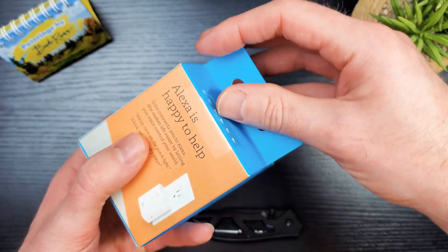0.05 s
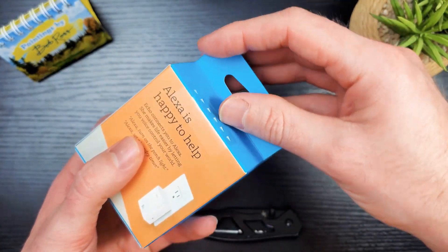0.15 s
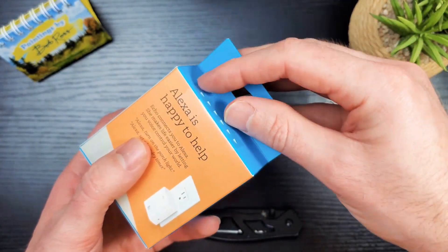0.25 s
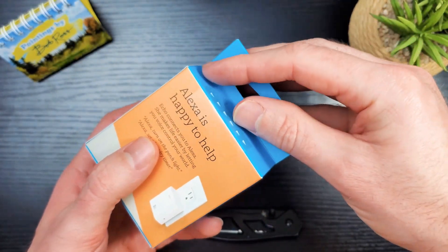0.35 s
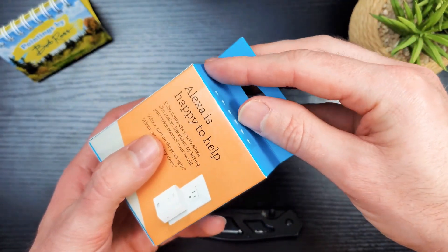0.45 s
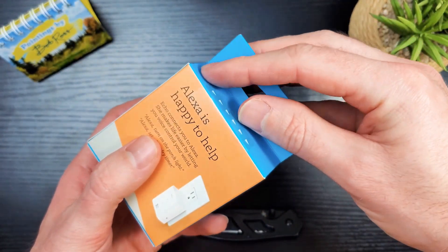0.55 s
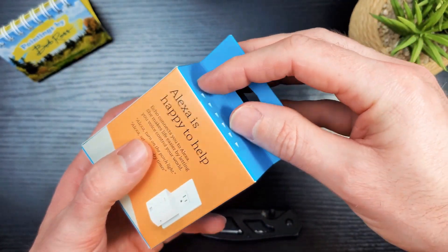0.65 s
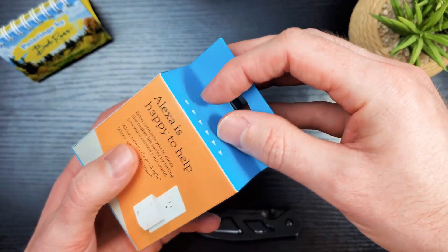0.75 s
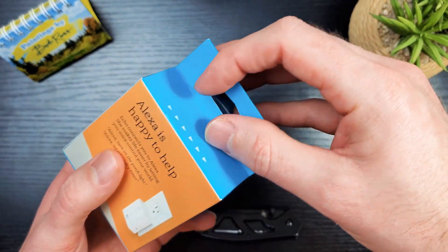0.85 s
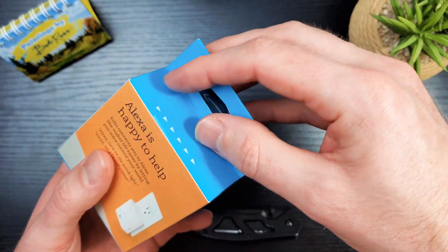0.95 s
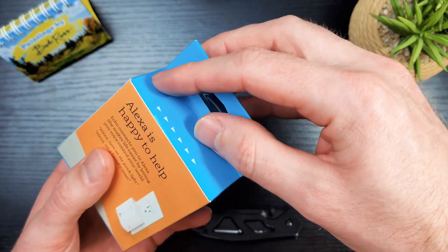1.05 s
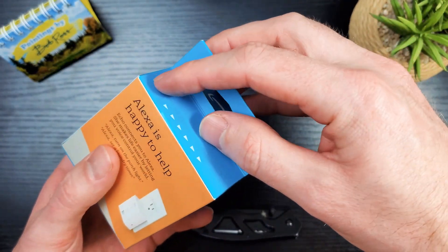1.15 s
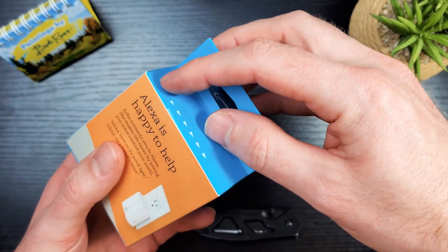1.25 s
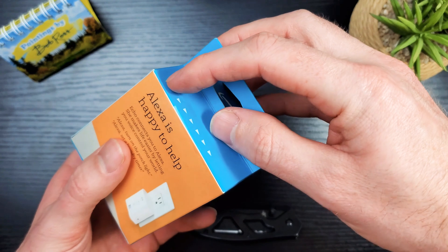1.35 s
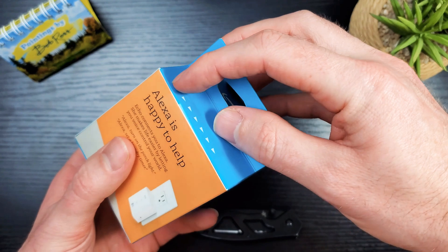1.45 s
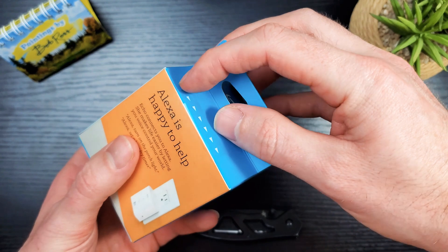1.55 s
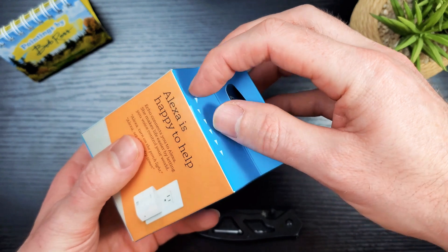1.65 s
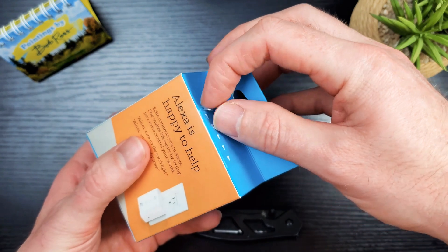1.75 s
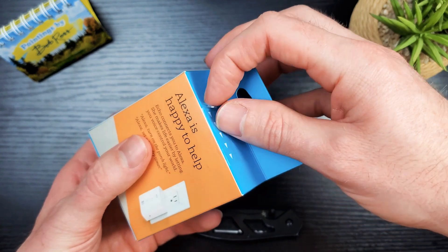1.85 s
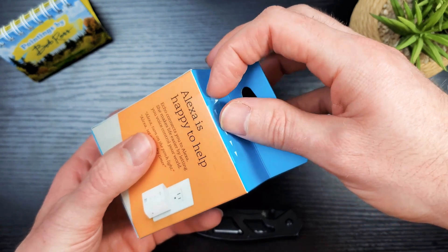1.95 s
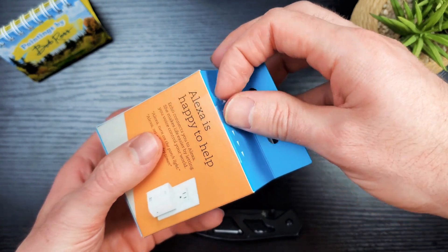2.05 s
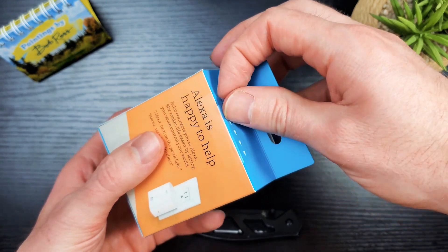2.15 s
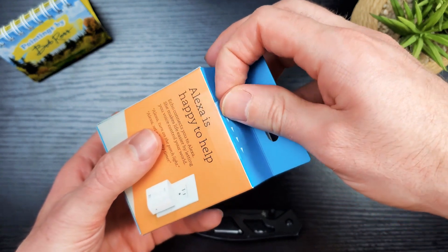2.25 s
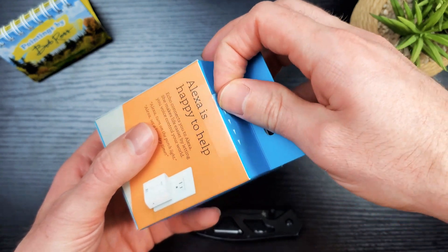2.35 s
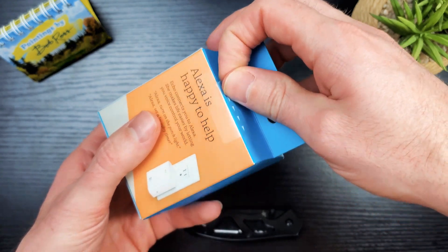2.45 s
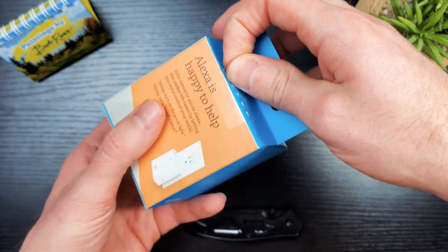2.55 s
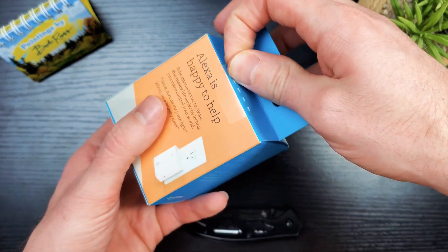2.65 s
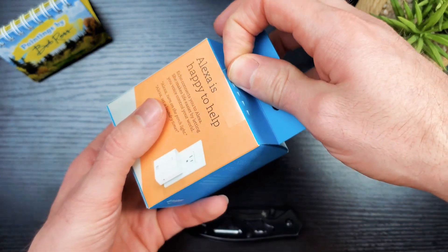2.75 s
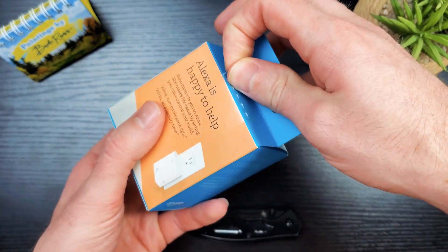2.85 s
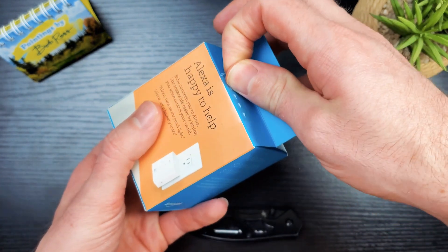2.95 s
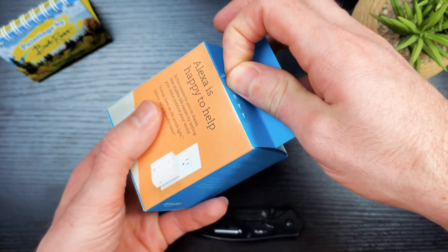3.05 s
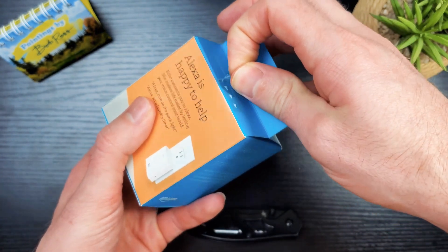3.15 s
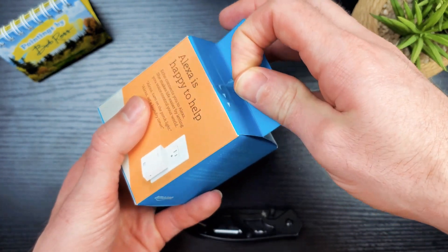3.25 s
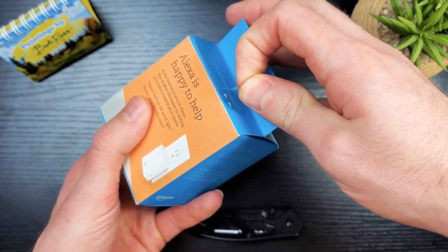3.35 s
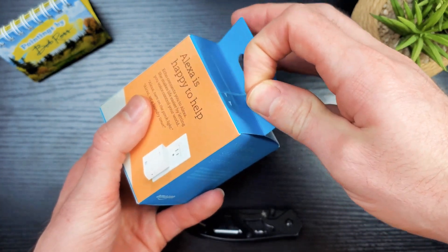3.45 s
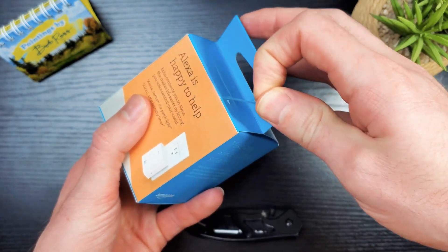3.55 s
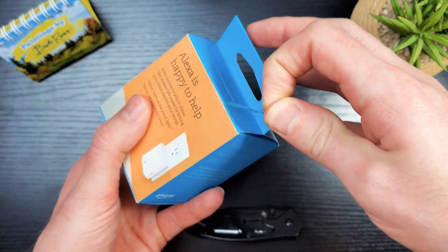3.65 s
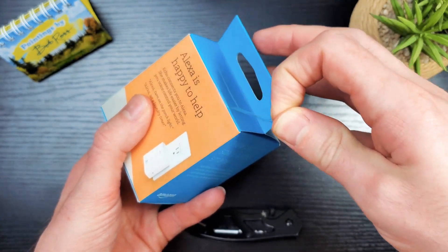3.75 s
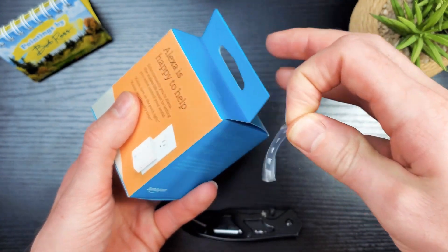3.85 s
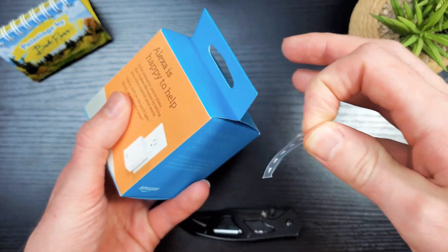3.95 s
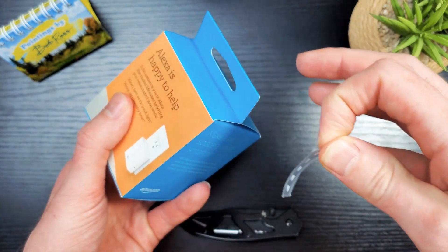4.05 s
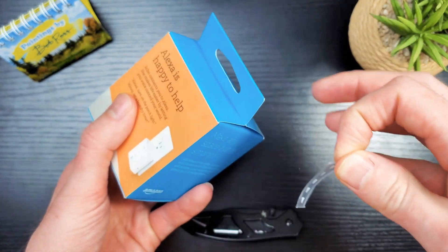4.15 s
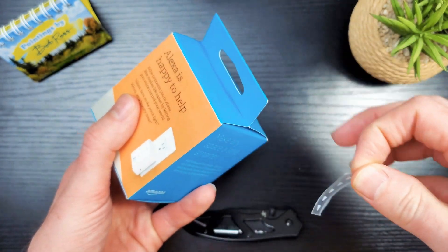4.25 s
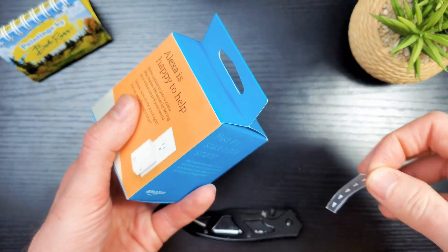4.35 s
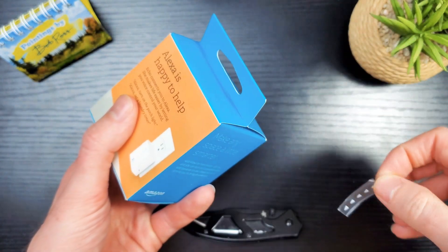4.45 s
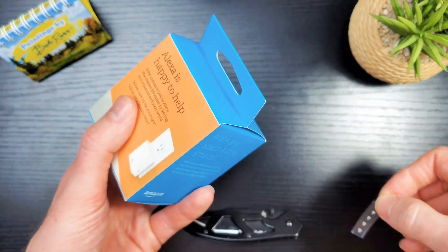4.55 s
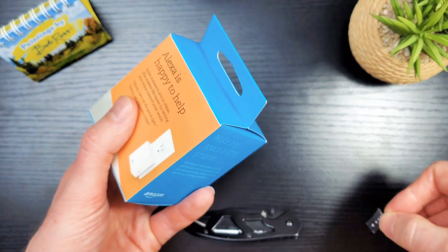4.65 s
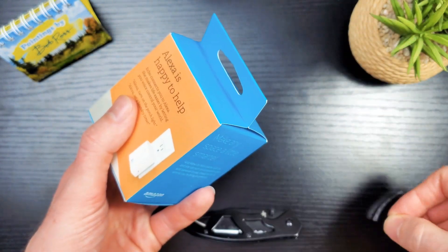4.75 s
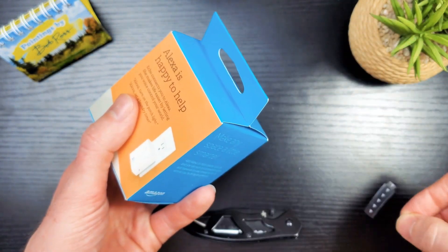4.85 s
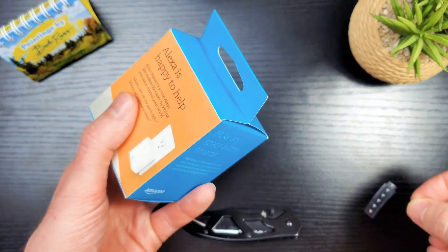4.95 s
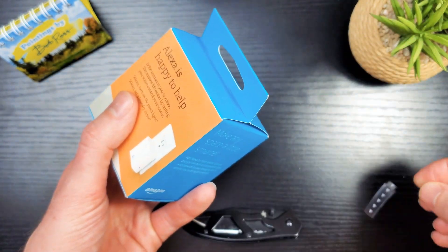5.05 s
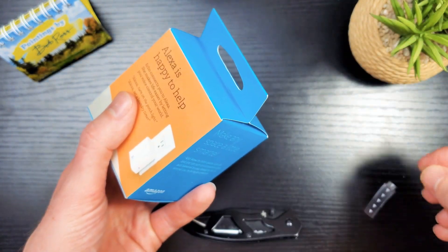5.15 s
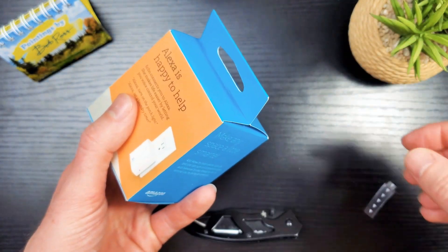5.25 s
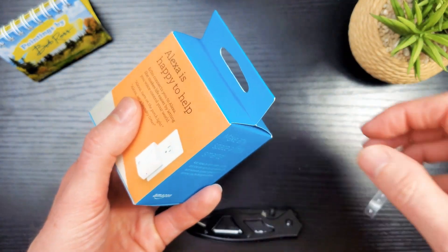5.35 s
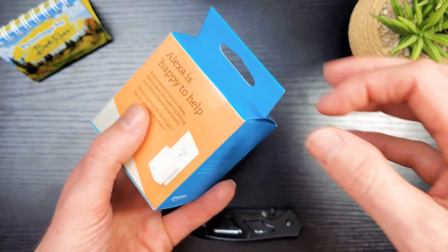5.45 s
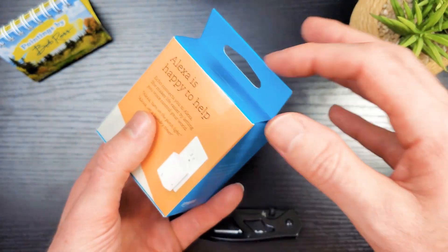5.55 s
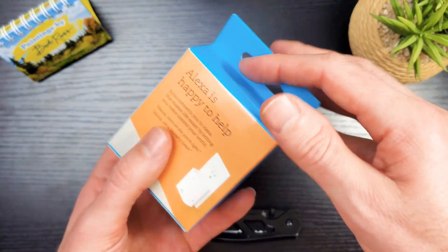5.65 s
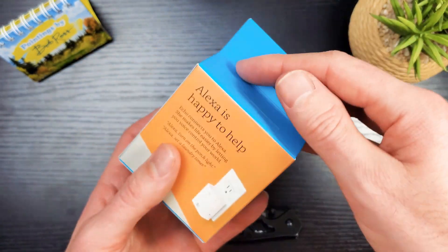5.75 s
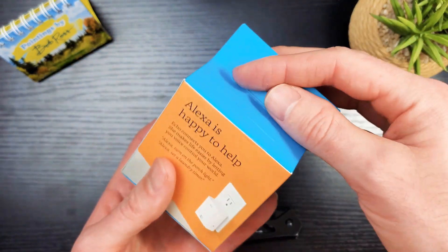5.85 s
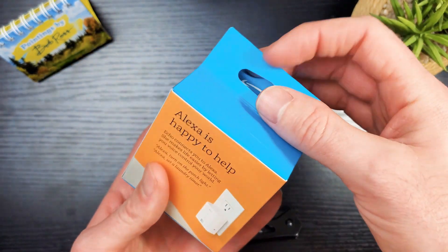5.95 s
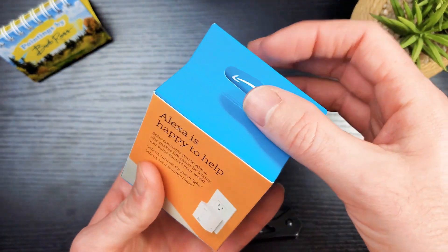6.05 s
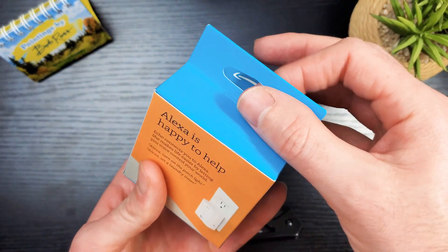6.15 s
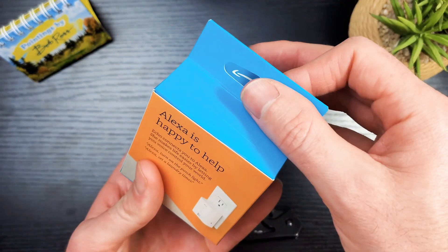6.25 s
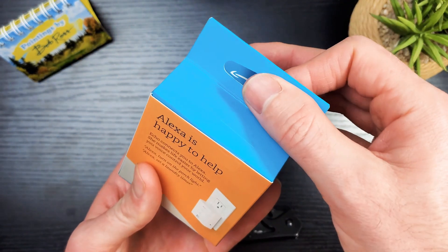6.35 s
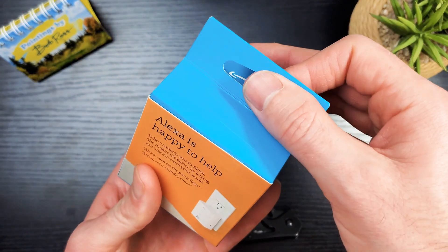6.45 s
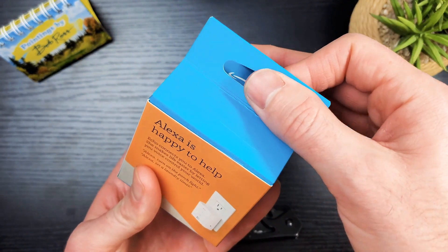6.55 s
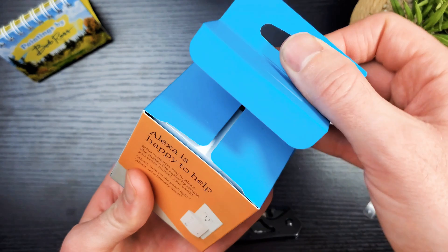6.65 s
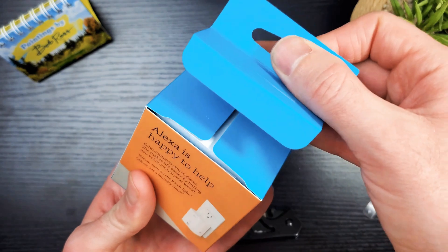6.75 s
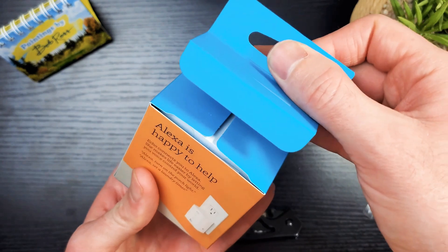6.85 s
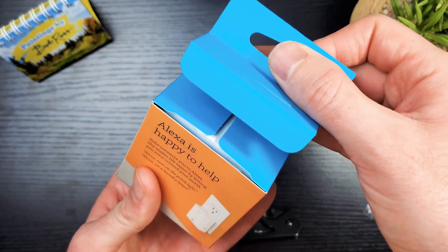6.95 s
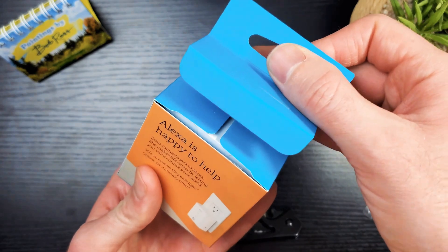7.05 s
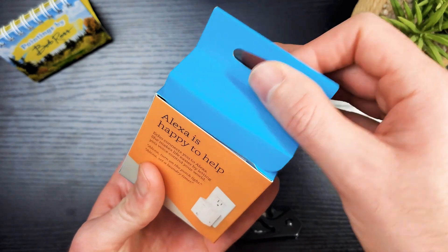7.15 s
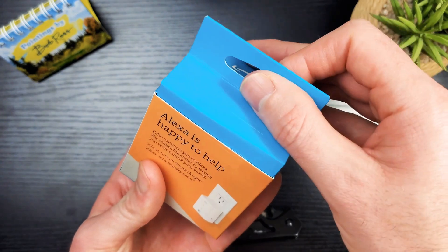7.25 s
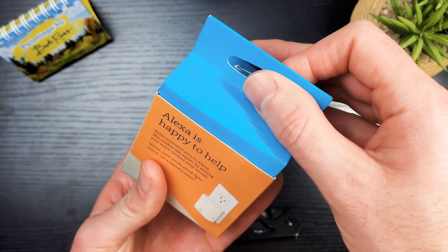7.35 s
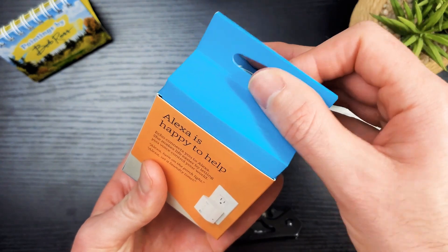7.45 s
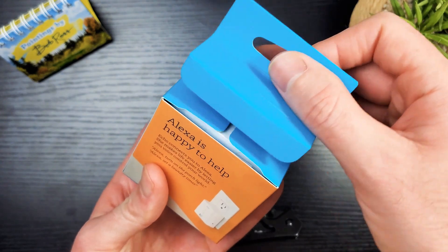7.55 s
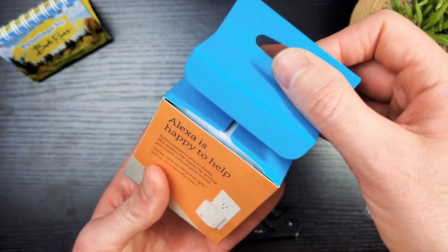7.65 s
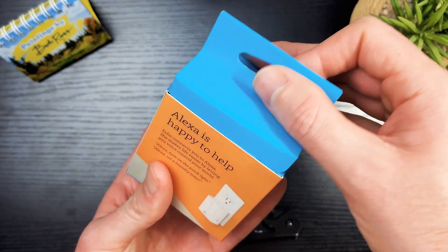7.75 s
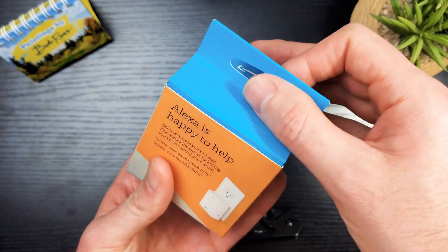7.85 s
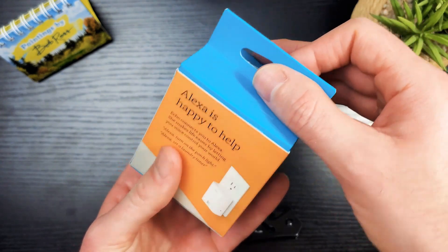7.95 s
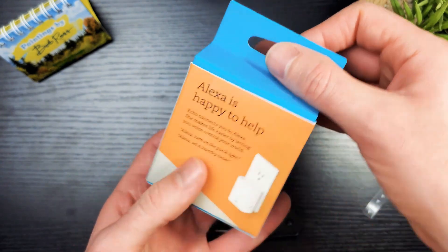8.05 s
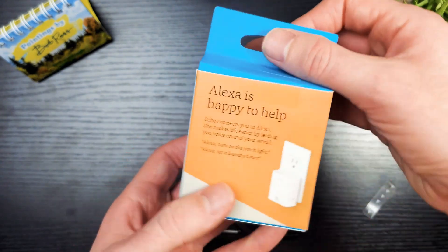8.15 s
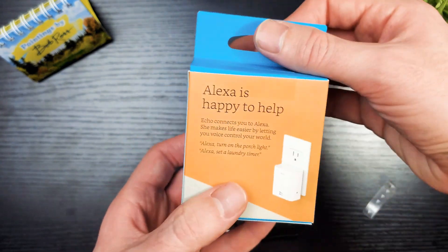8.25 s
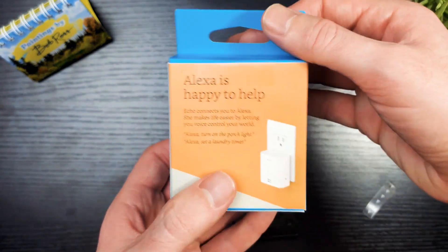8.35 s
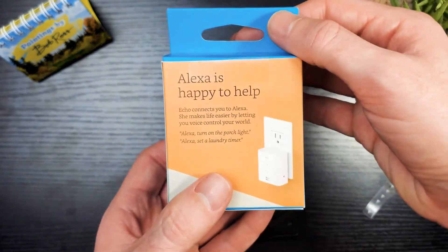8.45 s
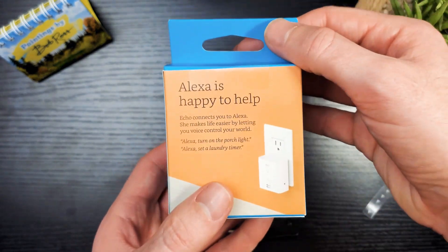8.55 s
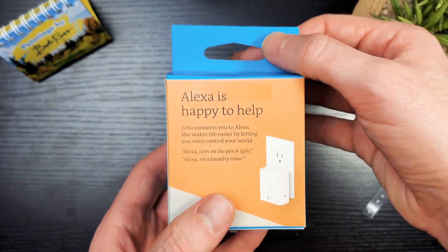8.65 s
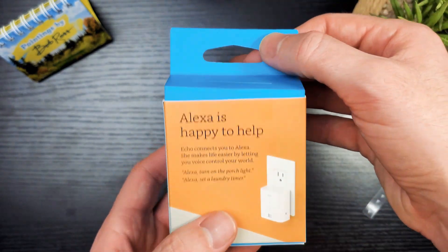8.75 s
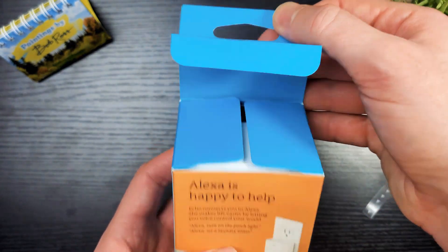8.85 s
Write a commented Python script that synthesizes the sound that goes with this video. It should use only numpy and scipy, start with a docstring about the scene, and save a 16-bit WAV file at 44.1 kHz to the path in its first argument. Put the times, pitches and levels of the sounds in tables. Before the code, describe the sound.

A small cardboard box is handled close to the microphone in a quiet room with a faint low rumble. For the first 2.7 seconds, fingers softly slide, tap and pick at the lid, with a few light bumps near 0.8 seconds. From about 2.9 seconds, sealing tape peels with faint ticks and rasps, snapping free with a small knock at 3.8. After a lull, the strip lands on the desk with one sharp, light click at 4.8. Rubbing and tapping resume from 5.7 seconds. At 6.6 the lid flap jerks out of its slot with a loud scrape and a hollow thump, followed by small snaps. It scrapes in and out with soft jolts at about 7.2, 7.5 and 7.8. Fingers slide over the card from 8 to 8.7 seconds, then the flap is pushed home around 8.8 with quick, loud scrapes and two low thumps.

```python
"""Fingers slide, tap and pick at a small cardboard box, close to the microphone in a quiet room.
They peel off a strip of sealing tape, which ticks as it lifts, and drop it on the desk. Then, loudest,
the lid's tuck flap jerks out of its slot, scrapes in and out and is pushed home, jolting the box.
Friction is a run of tiny slips that ring the card; the card flexes, so its resonances drift."""
import sys
import numpy as np
from scipy import signal
from scipy.fft import rfft, irfft
from scipy.io import wavfile
from scipy.ndimage import uniform_filter1d, map_coordinates

SR = 44100
rng = np.random.default_rng(int(sys.argv[2]) if len(sys.argv) > 2 else 0)


def int16_out(signal):
    """Quantize to a 16-bit WAV file."""
    q = np.round(np.clip(np.atleast_2d(signal).T, -1, 1) * 32767)
    wavfile.write(sys.argv[1], SR, q.astype(np.int16))


N = 392931
TIME_S = np.arange(N) / SR
FFT_SIZE = 4096
FFT_HZ = np.fft.rfftfreq(FFT_SIZE, 1 / SR)


def from_db(db):
    """Decibels to amplitude."""
    return 10 ** (np.asarray(db) / 20)


def unit_rms(x):
    """Scale to rms 1."""
    return x / np.sqrt(np.mean(x ** 2) + 1e-20)


def log_interp(points, hz):
    """Join (freq_hz, value) points on a log-frequency axis."""
    freq_hz, value = np.transpose(points)
    return np.interp(np.log(hz + 1), np.log(freq_hz + 1), value)


def add(mix, start_s, sound):
    """Mix a sound in at start_s."""
    part = mix[max(round(start_s * SR), 0):][:len(sound)]
    part += sound[:len(part)]


def wander(size, span_samples):
    """Random drift, rms about 1."""
    at = np.arange(size) / span_samples
    knots = int(at[-1]) + 2
    return np.interp(at, np.arange(knots), rng.standard_normal(knots)) * np.sqrt(3 / 2)


def coloured_noise(spectrum):
    """Steady noise, rms 1, shaped by (freq_hz, relative_db) points."""
    gain = from_db(log_interp(spectrum, np.fft.rfftfreq(N, 1 / SR)))
    return unit_rms(irfft(rfft(rng.standard_normal(N)) * gain, N))


# Still room's spectrum: freq_hz, relative_db
AIR_SPECTRUM = [(15, -55), (25, -29.5), (49, -3.5), (122, -2.5), (204, -25.5), (253, -22), (631, -31.5),
                (945, -31), (2120, -36), (15500, -40)]
def room_tone(level_db=-54.5):
    """The still room: low rumble and faint hiss."""
    return from_db(level_db) * coloured_noise(AIR_SPECTRUM)


# Room decay: freq_hz, t60_s
ROOM_DECAY = [(200, 0.356), (4000, 0.23), (15000, 0.069)]
def reflections(x, echoes_per_s=5000, gap_s=0.004):
    """Sparse echoes from desk and walls, each band dying at its own rate."""
    size = SR // 2
    echoes = rng.standard_normal(size) * (rng.random(size) < echoes_per_s / SR)
    echoes *= np.arange(size) > gap_s * SR
    hz, t, spectra = signal.stft(echoes, SR, nperseg=256)
    colour_db = log_interp([(100, 0.73), (1400, 0.9), (8000, -1.9), (15000, -1.1)], hz)
    decay_db = 60 * t / log_interp(ROOM_DECAY, hz)[:, None]
    tail = signal.istft(spectra * from_db(colour_db[:, None] - decay_db), SR, nperseg=256)[1]
    return signal.oaconvolve(x, tail / np.linalg.norm(tail))[:N]


# Holding hand: time_s, creep_db, rumble_db
GRIP = [(0, -64.5, -52.5), (1.4, -67.5, -56.5), (1.9, -60.5, -52), (2.7, -73.5, -55), (3.7, -64, -57.5),
        (4.2, -97, -64.5), (5.35, -91, -64), (5.5, -69.5, -56), (6.3, -61, -56), (6.85, -64, -52),
        (7.05, -73.5, -58), (7.65, -68.5, -58.5), (8.1, -55, -54), (8.9, -50.5, -50.5)]
def hand_rumble():
    """The hands rumble softly while holding the box."""
    time_s, _, rumble_db = np.transpose(GRIP)
    spectrum = [(20, -19.5), (42, -2.5), (62, 2.5), (125, -12.5), (200, -10), (330, -14.5), (1500, -77)]
    return coloured_noise(spectrum) * from_db(np.interp(TIME_S, time_s, rumble_db))


def skin_creep_rows(length_s=0.24, body_db=3.5, fizz_db=-6):
    """Skin creeps on the card: rows of faint, overlapping slides."""
    time_s, creep_db, _ = np.transpose(GRIP)
    return [(start_s, length_s, np.interp(start_s + length_s / 2, time_s, creep_db), body_db, fizz_db)
            for start_s in np.arange(0, TIME_S[-1], length_s / 2)]


# Limits of the body, middle and fizz bands: edge_hz
BAND_EDGES_HZ = [200, 2500, 9500, 16000]
def contact_bands(modes, ripple_db=6.5):
    """A sheet's body, middle and fizz responses; each contact point favours other resonances."""
    power = sum(from_db(db) ** 2 / (1 + (2 * (FFT_HZ - hz) / width_hz) ** 2) ** 1.224
                for hz, width_hz, db in modes)
    # Card is lossy: its fine resonances broaden as they rise.
    ripple = np.column_stack([np.geomspace(100, SR / 2, 70), rng.uniform(-1, 1, 70)])
    power *= from_db(ripple_db * log_interp(ripple, FFT_HZ)) ** 2
    low_hz, *splits_hz, high_hz = BAND_EDGES_HZ
    above_body, fizz = [1 / (1 + (hz / (FFT_HZ + 1)) ** 14) for hz in splits_hz]
    bands = power * np.array([1 - above_body, above_body - fizz, fizz]).clip(0)
    in_range = (FFT_HZ > low_hz) & (FFT_HZ < high_hz)
    return np.sqrt(bands / (bands * in_range).mean(1, keepdims=True))


def minimum_phase(gain):
    """Impulse response that starts at once and rings out with these gains."""
    log_gain = np.log(np.maximum(gain, gain.max() * 1e-5))
    mirrored = np.concatenate([log_gain, log_gain[-2:0:-1]])
    return np.fft.ifft(np.exp(np.conj(signal.hilbert(mirrored)))).real


def ring_sheet(drive, modes, body_db, fizz_db):
    """A push rings the sheet at one point; body_db and fizz_db are relative to the middle band."""
    bands = contact_bands(modes)
    blocks = len(drive) // FFT_SIZE + 1
    drive_power = uniform_filter1d(abs(rfft(drive, blocks * FFT_SIZE)) ** 2, size=blocks)[::blocks]
    band_feed = (bands ** 2 * drive_power).sum(1) / (bands ** 2).sum(1) / drive_power.mean()
    weights = from_db([body_db, 0, fizz_db]) / np.sqrt(band_feed)
    ring = minimum_phase(np.linalg.norm(weights[:, None] * bands, axis=0))
    dispersion = np.exp(-2j * np.pi * 0.06 * np.sqrt(FFT_HZ))  # bending waves: treble arrives first
    return signal.fftconvolve(drive, irfft(rfft(ring) * dispersion)[:FFT_SIZE // 2])


def moving_contact(drive, modes, body_db, fizz_db, flex_share=0.025, flex_s=0.06):
    """The contact moves between two points while flexing shifts all resonances together."""
    travel = np.linspace(0, 1, len(drive))
    ring = sum(ring_sheet(drive * share, modes, body_db, fizz_db) for share in (1 - travel, travel))
    pitch_ratio = 1 + flex_share * wander(len(ring), flex_s * SR)
    return map_coordinates(ring, [np.cumsum(pitch_ratio)], order=3)


def friction(size, slips_per_s, spread_db, hiss):
    """Fibres catch and let go in tiny uneven slips, over a smooth hiss."""
    heights = from_db(spread_db * np.minimum(rng.exponential(1, size), 3.5)) * rng.choice([-1, 1], size)
    slips = heights * (rng.random(size) < slips_per_s / SR)
    return unit_rms(unit_rms(slips) + hiss * rng.standard_normal(size))


def slides(rows, modes, slips_per_s, spread_db, unsteady_db, skew=0.76, arch=0.76):
    """Slow strokes, loudest where the hand moves fastest."""
    out = np.zeros(N)
    for start_s, length_s, level_db, body_db, fizz_db in rows:
        size = round(length_s * SR)
        speed = abs(np.sin(np.pi * np.linspace(0, 1, size) ** skew)) ** arch
        drive = speed * friction(size, slips_per_s, spread_db, hiss=0.93)
        drive *= from_db(level_db + unsteady_db * wander(size, span_samples=470))
        add(out, start_s, moving_contact(drive, modes, body_db, fizz_db))
    return out


def drags(rows, modes, slips_per_s, spread_db, judder_db, release_s):
    """Juddering runs of slips that swell or fade, then let go."""
    out = np.zeros(N)
    for start_s, length_s, level_db, body_db, fizz_db, swell_db in rows:
        t = np.arange(0, length_s + 5 * release_s, 1 / SR)
        judder = judder_db * wander(len(t), span_samples=89.4)
        force = from_db(swell_db * np.minimum(t / length_s, 1) + judder)
        force *= np.minimum(2 * t / release_s, 1) * np.exp(-np.maximum(t - length_s, 0) / release_s)
        slips = friction(len(t), slips_per_s, spread_db, hiss=0.86)
        drive = unit_rms(force * slips) * np.sqrt(length_s / t[-1])
        add(out, start_s, from_db(level_db) * moving_contact(drive, modes, body_db, fizz_db))
    return out


def clicks(rows, modes, crush_s, crush_gain):
    """The contact creeps, gives way sharply and briefly crushes fibres; the sheet rings."""
    out = np.zeros(N)
    t = np.arange(-SR // 100, SR // 100) / SR
    impulse = unit_rms(1.0 * (t == 0))
    envelope = np.exp(-abs(t) / crush_s) * np.where(t < 0, 0.38, 1)
    for time_s, level_db, body_db, fizz_db in rows:
        crush = unit_rms(rng.standard_normal(len(t)) * envelope)
        drive = unit_rms(impulse + crush_gain * crush) / np.sqrt(2)
        add(out, time_s + t[0], from_db(level_db) * ring_sheet(drive, modes, body_db, fizz_db))
    return out


# Fingers sliding: start_s, length_s, level_db, body_db, fizz_db
FINGER_SLIDES = [(0.0, 0.098, -57, 6, -1), (0.086, 0.2, -55.5, 3.5, 0.5), (0.528, 0.29, -51, -5.5, -4),
                 (0.692, 0.066, -61.5, 17, -15), (0.799, 0.15, -58.5, 5.5, -2), (.95, 0.35, -57.5, 2.5, -5),
                 (1.312, 0.05, -56.5, 6, -7), (1.636, 0.097, -53.5, 3, -5.5), (1.753, 0.1, -42, 0, -7),
                 (1.875, 0.13, -49, 5, -8), (1.974, 0.2, -59, 7, 1), (2.229, 0.081, -53, 1.5, -3),
                 (5.722, 0.076, -52, -1, 8.5), (5.815, 0.12, -50.5, 1.5, 3), (5.901, 0.24, -45.5, -2, 3),
                 (6.487, .188, -56, 14, -2), (8.042, 0.25, -43, -5, 1), (8.262, 0.18, -43, -6, -0.5),
                 (8.398, 0.094, -39, -5.5, -2.5), (8.637, .078, -46, -2, -12)]
# Short nail or fingertip drags: start_s, length_s, level_db, body_db, fizz_db, swell_db
FINGER_DRAGS = [(0.728, 0.013, -45, 9, -8, 30), (1.392, 0.016, -63, 15.5, -8, 0),
                (1.456, 0.022, -50, 5, -11.5, -8), (1.551, 0.034, -54, 10.5, -9.5, 9),
                (1.64, 0.02, -42.5, 2.5, -4.5, 10), (2.405, 0.037, -51, 3, -4.5, -1),
                (3.129, 0.011, -41, 7, -13, 18), (3.328, 0.015, -44, 4.5, -1.5, 0),
                (5.934, 0.014, -39.5, 6, -4, 19), (6.162, .085, -43, -2.5, 3.5, 2.5),
                (6.389, 0.022, -44, 9.0, -10, -0.5), (6.558, 0.021, -38, 6, -6.5, -12),
                (7.705, 0.023, -51.5, 8, -14, -6), (8.117, 0.034, -27.5, -2, -6.5, 6.5),
                (8.299, 0.027, -38.5, 4.5, -15, -14)]
# Finger and nail taps: time_s, level_db, body_db, fizz_db
FINGER_TAPS = [(0.1568, -45, 15, -22), (0.316, -52.5, 9.5, -18.5), (0.4798, -59, 19.5, -3),
               (1.6915, -45.5, 3.5, -18.5), (1.9648, -38.5, -11, -6), (2.051, -40.5, 0.5, 0.5),
               (2.266, -41, 6.5, -3.5), (2.58, -54.5, 10, -8), (5.4289, -62.5, 13.5, -26),
               (5.6932, -44, 2, -7), (5.761, -37, 3.5, -4), (6.0322, -43, 11.5, -17),
               (6.1186, -42.5, 12.5, -11), (6.1708, -42.5, 9, -15), (6.2201, -32.5, 8.5, -1),
               (6.2987, -51, 12, -11), (6.501, -45, 7.5, -3), (8.2915, -36.5, 0, -8)]
def touch_face(modes, start_s, end_s):
    """Fingers creep, slide, drag and tap on one face of the box."""
    rubs, picks, taps = ([row for row in rows if start_s <= row[0] < end_s]
                         for rows in (skin_creep_rows() + FINGER_SLIDES, FINGER_DRAGS, FINGER_TAPS))
    return (slides(rubs, modes, slips_per_s=1800, spread_db=1.5, unsteady_db=2.5)
            + drags(picks, modes, slips_per_s=6000, spread_db=6, judder_db=0.5, release_s=0.0043)
            + clicks(taps, modes, crush_s=0.0018, crush_gain=2.4))


# Resonances of the taut, taped lid and of the walls: freq_hz, width_hz, gain_db
LID_MODES = [(290, 90, -16), (991, 184, 5), (1465, 290, 3), (1850, 580, -5.5), (4450, 2200, -13.5),
             (5260, 690, -12), (8060, 1350, -13), (13853, 2100, -25.5)]
WALL_MODES = [(120, 98, 2.5), (277.4, 57, 1), (640.75, 290, -2), (990, 33, 4.5), (1076, 150, 2),
              (1424, 245, 2), (1870, 360, -5), (3270, 320, -4.5), (4577, 830, 1), (5550, 730, -1.5),
              (7900, 1300, -2), (13700, 1200, -14.5)]
def fingers(leave_lid_s=2.7):
    """Fingers feel over the lid for the tape's end, then move to the walls."""
    return touch_face(LID_MODES, 0, leave_lid_s) + touch_face(WALL_MODES, leave_lid_s, np.inf)


# Resonances of the stiff tape and the card under it: freq_hz, width_hz, gain_db
TAPE_MODES = [(700, 190, 0), (920, 180, 5), (1490, 170, -1.5), (2110, 700, -16), (4970, 2700, -4),
              (8320, 1140, -2), (14400, 2700, -5)]
# Tugs on the tape: start_s, length_s, level_db, body_db, fizz_db
TAPE_TUGS = [(3.112, 0.07, -55.5, 2, 5.5), (3.165, 0.14, -46.5, 2, -5), (3.284, 0.19, -57, 2, -5),
             (3.47, 0.15, -53.5, 2, -3), (3.55, 0.3, -70, 9.5, 4), (3.81, 0.051, -46, -2, 1),
             (3.855, 0.039, -52.5, -11, 10.5)]
# Sticky tape letting go: time_s, level_db, body_db, fizz_db
TAPE_TICKS = [(2.8761, -57, -11, 3.5), (2.9469, -54, -7.5, 4), (3.0541, -57.5, -13, 5.5),
              (3.111, -62, -4, 8), (3.214, -53, 2, 0), (3.8115, -56, 9, -2), (3.8155, -52, -4, 8),
              (3.8224, -45, 2, 8), (3.8267, -45, 0, 2), (3.8313, -34, 5, 1), (3.8385, -47, -4, 10),
              (5.4946, -52, -8, -7)]
def tape_peel():
    """Tugged tape ticks as it lifts, then snaps off the lid."""
    return (slides(TAPE_TUGS, TAPE_MODES, slips_per_s=450, spread_db=3, unsteady_db=2)
            + clicks(TAPE_TICKS, TAPE_MODES, crush_s=0.00049, crush_gain=2.3))


# Resonances of the loose strip: freq_hz, width_hz, gain_db
LOOSE_TAPE_MODES = [(1270, 230, -6), (2120, 750, -11), (5300, 960, -7.5), (8400, 950, 4), (14020, 3000, -8)]
# Strip landing: time_s, level_db, body_db, fizz_db
TAPE_LANDING = [(4.8036, -28, -18.5, -12)]
def tape_drop():
    """The strip hits the desk with one click."""
    return clicks(TAPE_LANDING, LOOSE_TAPE_MODES, crush_s=0.0011, crush_gain=0.3366)


# Full box jolting; fingertips landing on the hollow box: start_s, level_db, pitch_hz, t60_s
BOX_JOLTS = [(0.741, -34.5, 124, 0.19), (6.171, -22.5, 76.15, 0.063), (6.627, -11, 120, 0.063),
             (6.651, -12.5, 68.6, 0.11), (7.235, -14, 117, 0.046), (7.513, -26.5, 120, 0.0497),
             (7.812, -19.5, 121.4, 0.1), (8.294, -31, 117.2, 0.057), (8.8, -15.5, 73, 0.082),
             (8.879, -4.5, 70, 0.077)]
FINGER_BUMPS = [(.744, -30.5, 317, 0.073), (.785, -27.5, 331, 0.014), (.892, -38.5, 370, 0.028),
                (3.832, -24.5, 326, 0.027), (4.043, -44, 380, 0.02), (5.94, -23, 290, .03),
                (7.771, -34, 190, 0.045), (8.489, -29.5, 147, 0.049)]
def box_thuds():
    """Soft blows set the box swinging for a few cycles."""
    out = np.zeros(N)
    t = np.arange(SR // 4) / SR
    for rows, rise_s in ((BOX_JOLTS, 0.00089), (FINGER_BUMPS, 0.00015)):
        for start_s, level_db, pitch_hz, t60_s in rows:
            envelope = from_db(level_db - 60 * t / t60_s) * (1 - np.exp(-t / rise_s))
            add(out, start_s, envelope * np.sin(2 * np.pi * pitch_hz * t))
    return out


def slot_scrape(rows, modes, tail_s=0.098, body_db=-0.5, fizz_db=-7, fade_db=-27.5):
    """The flap grinds through its slot's tight spot; a short, fading, noisy tail follows each scrape."""
    tight = [row[:-1] for row in rows]
    tail = [(start_s + length_s, tail_s, level_db + tail_db, body_db, fizz_db, fade_db)
            for start_s, length_s, level_db, *_, tail_db in rows]
    return (drags(tight, modes, slips_per_s=3000, spread_db=4, judder_db=1.5, release_s=0.00091)
            + drags(tail, modes, slips_per_s=900, spread_db=2, judder_db=3, release_s=0.0077))


# Resonances of the free lid and flap, and of the closed box: freq_hz, width_hz, gain_db
FLAP_MODES = [(304, 370, -2), (680, 180, -2), (956, 96, 3.5), (1120, 110, 3), (1430, 230, 6),
              (1780, 400, -4.5), (2150, 160, -1), (3029, 520, -1.5), (4360, 280, 4), (4670, 1400, 1),
              (7400, 190, 2.5), (8650, 1700, -3), (13100, 1700, -8.5)]
CLOSED_MODES = [(660, 250, -3), (980, 100, 4.5), (1113, 79, 4), (1365, 150, 6.5), (1600, 90, 1),
                (3000, 1200, -0.5), (3530, 770, -6), (5100, 860, 1.5), (8750, 2200, -9), (14000, 3000, -16)]
# Edge scraping in the slot: start_s, length_s, relative_db, body_db, fizz_db, swell_db, tail_db
FLAP_SCRAPES = [(6.6262, .026, -16.5, -1.5, -6.5, 2, -16.5), (6.8002, 0.0067, -29.5, -1.5, -14, -6, -45),
                (7.205, .012, -29.5, -1, -17.5, -2, -38), (7.219, 0.018, -25.5, -3, -4.5, 8, -13),
                (7.3404, 0.0072, -39, -2.5, -5, 1, -45), (7.504, 0.0032, -25, -10, -8, 4, -19.5),
                (7.515, .019, -22, -5.5, -6.5, 16, -30), (7.798, 0.012, -32, 4, -13, 1, -32),
                (7.81, 0.071, -28, -5, -6, -7, -19.5), (8.793, 0.014, -21.5, 2.5, -8, 18, -25),
                (8.809, .012, -20, 4.5, -10, 13, -27), (8.834, 0.0048, -19, 0, -30, 12, -35),
                (8.842, .014, -18, 0.5, -29, -3, -39), (8.857, .012, -11, -9.5, -14, 2, -27)]
# Edge catching and snapping free: time_s, relative_db, body_db, fizz_db
FLAP_SNAPS = [(6.6269, -25.5, 4, -6), (6.8056, -33, -6.5, -8.5), (6.8206, -25.5, -4, -6.5),
              (6.8418, -39, -1, 0.5), (6.8668, -35, -3.5, -3), (6.8923, -50, 7, -1.5),
              (6.905, -56, 7.5, -6), (7.1218, -63.5, 13.5, -17), (7.2215, -32.5, 6.5, -25),
              (8.8755, -31.5, 10, -20)]
def tuck_flap(wedged_s=8.7, gain_db=2.5):
    """The flap scrapes and snaps; as it is forced home, its scrapes ring the closed box."""
    free = [row for row in FLAP_SCRAPES if row[0] < wedged_s]
    wedged = [row for row in FLAP_SCRAPES if row[0] >= wedged_s]
    scrapes = slot_scrape(free, FLAP_MODES) + slot_scrape(wedged, CLOSED_MODES)
    snaps = clicks(FLAP_SNAPS, FLAP_MODES, crush_s=0.0011, crush_gain=1.6)
    return from_db(gain_db) * (scrapes + snaps)


def scene(box_send_db=-19, desk_send_db=-7.5, desk_lowpass_hz=2800):
    """The box close up; the desk farther off, so with more of the room."""
    box = fingers() + tuck_flap() + tape_peel()
    drop = tape_drop()
    box += box_thuds()
    # The strip beams its treble; the desk's duller knock fills the room.
    knock = signal.lfilter(*signal.butter(1, desk_lowpass_hz, fs=SR), drop)
    room = reflections(from_db(box_send_db) * box + from_db(desk_send_db) * knock)
    return (box + drop + room + hand_rumble() + room_tone())[None]


def gain_control(x, threshold_db=-21.5, cut_share=0.15, recovery_db_per_s=1):
    """Loud scrapes turn the gain down a little; it creeps back up."""
    power_db = 10 * np.log10(abs(uniform_filter1d(x ** 2, size=400)) + 1e-12)
    recovery_db = TIME_S * recovery_db_per_s
    held_db = np.maximum.accumulate(power_db + recovery_db, axis=-1) - recovery_db
    return x / from_db(cut_share * np.maximum(held_db - threshold_db, 0))


def record(dry, highpass_hz=29.7, lowpass_hz=15750):
    """Microphone bass roll-off, gain control, soft clipping, band limit."""
    thinned = signal.lfilter(*signal.butter(2, highpass_hz, "high", fs=SR), dry)
    ducked = gain_control(thinned)
    rounded = ducked / (1 + ducked ** 6) ** (1 / 6)
    lowpass = signal.firwin(511, lowpass_hz, window=("kaiser", 9), fs=SR)
    return signal.oaconvolve(rounded, lowpass[None], "same")


dry = scene()
out = record(dry)
int16_out(out)
```